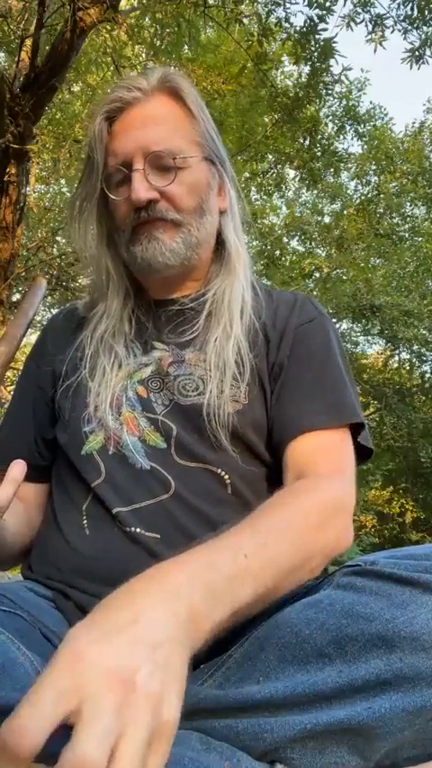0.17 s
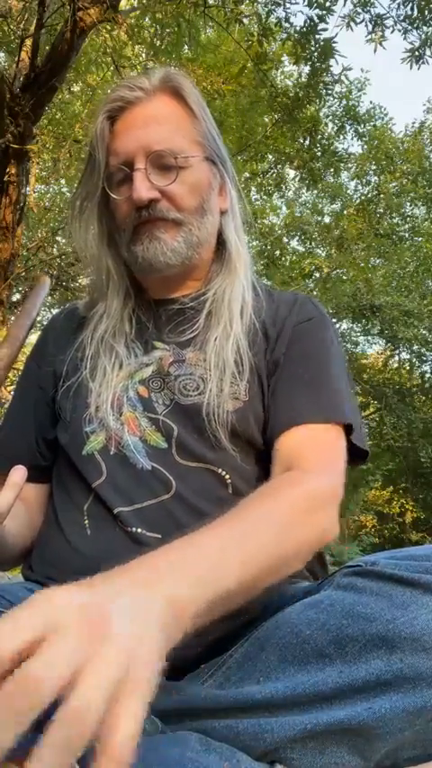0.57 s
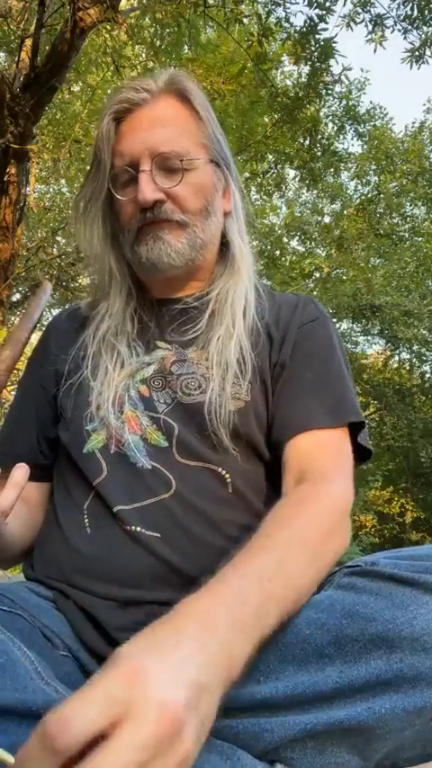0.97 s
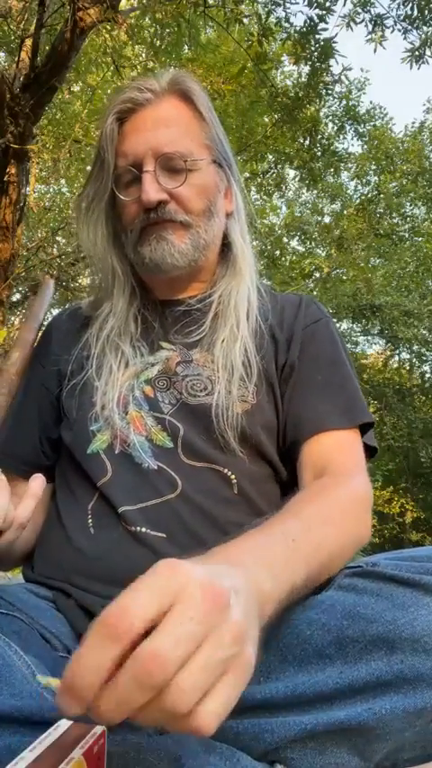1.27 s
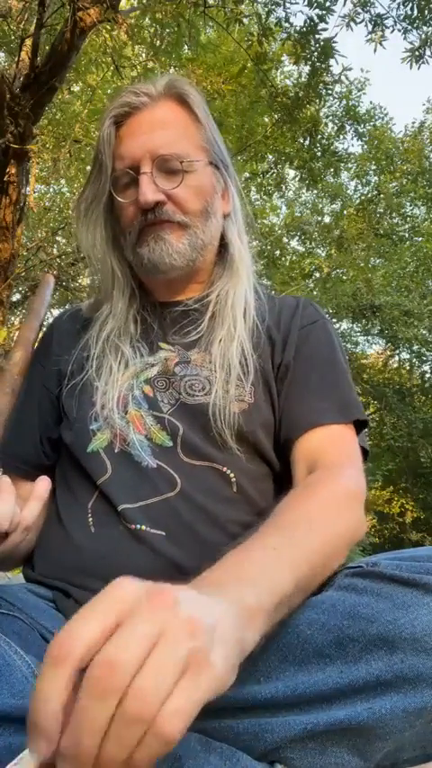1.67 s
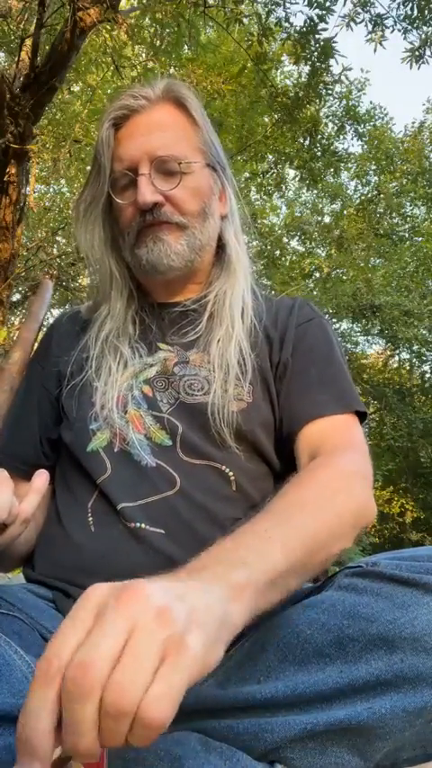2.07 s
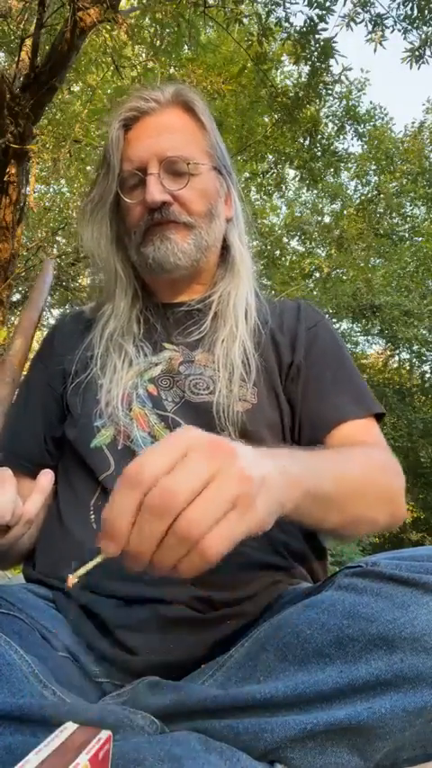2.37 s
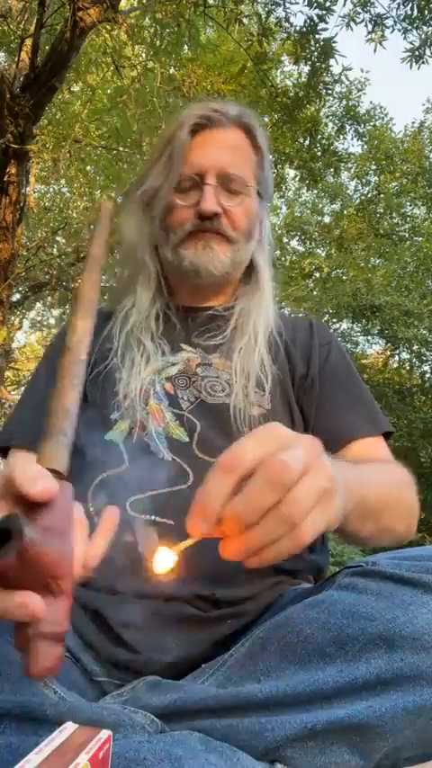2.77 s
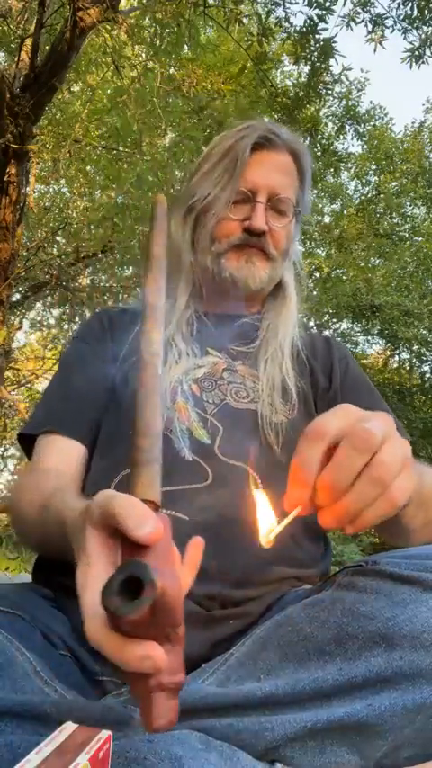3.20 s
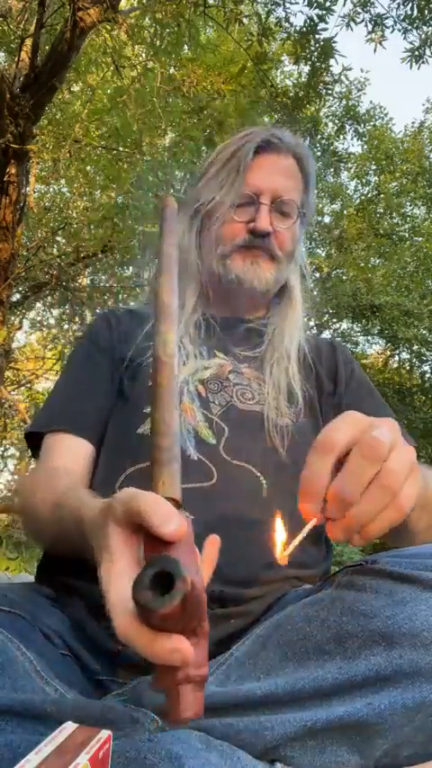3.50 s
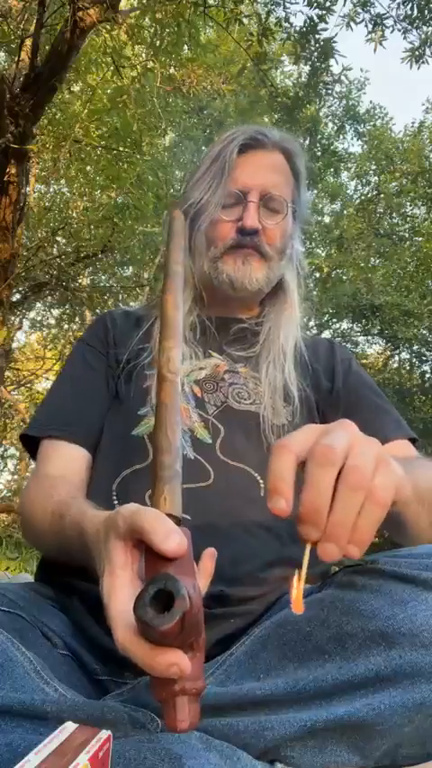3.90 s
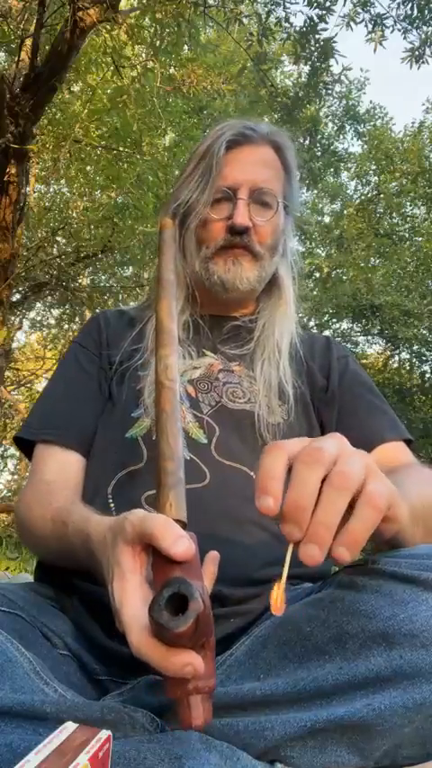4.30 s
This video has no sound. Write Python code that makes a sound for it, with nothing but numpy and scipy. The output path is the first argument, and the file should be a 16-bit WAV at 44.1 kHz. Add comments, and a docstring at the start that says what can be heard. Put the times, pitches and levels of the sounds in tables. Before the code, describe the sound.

A low traffic rumble with an engine drone and soft open-air wash runs throughout. Nearby, a match head makes gritty scrapes on a hollow cardboard box, with little snags and clacks. One fast stroke bursts into a bright, sharp crack; then a quiet breathy fizz with dull crackles swells to a thin sizzle and stops, leaving two tiny pops. Close, dry stereo pickup.

```python
"""Outdoors, over a low steady rumble and a soft wash of air, a match is scraped along a cardboard matchbox.
The first strokes only rasp: noisy grains follow the pressure, with ticks, hollow knocks and short clacks.
A quick last stroke cracks alight in a volley of tiny bursts with a bright, ringing edge, then spits thinly.
The head fizzes for about a second in filtered noise with puffs, crackles and pops, and ends in a sizzle;
a few pops follow. A two-port microphone hears it all, with phase and balance differing over frequency."""
import sys
import numpy as np
from scipy import signal
from scipy.fft import rfft, irfft, next_fast_len
from scipy.io import wavfile

SR = 44100
rng = np.random.default_rng(int(sys.argv[2]) if len(sys.argv) > 2 else 0)


def master(y):
    """Save y as 16-bit WAV."""
    cut = np.clip(np.atleast_2d(y).T, -1, 1)
    pcm = np.round(cut * 32767)  # scale
    wavfile.write(sys.argv[1], SR, pcm.astype(np.int16))


N = 196245
T = np.arange(N) / SR  # seconds
SIZE = 2 * next_fast_len(N // 2 + 4096)  # transform length, padded so that tails do not wrap around
HZ = np.fft.rfftfreq(SIZE, 1 / SR)

# Strokes of the head over the striker. Each row: start of full pressure in seconds, friction in dB before
# the layer trims, rise in seconds per 20 dB, hold in seconds, fall in seconds per 20 dB,
# level of the light glide after it in dB, box ring relative to the friction in dB.
STROKES = [ (0.034, -47.5, 0.074, 0.012, 0.11, -51.5, -1), (0.166, -28.5, 0.11, 0.042, 0.037, -51, -1.5),
           (0.699, -30.5, 0.0086, 0.021, 0.016, -53, -1.5), (0.908, -42, 0.17, 0.015, 0.26, -50.5, 0.5),
           (1.754, -45, 0.03, 0.006, 0.02, -70, 1), (2.138, -31, 0.019, 0.026, 0.033, -57, 0.5)]

# The burning of the head, shared by the crack and the fizz
LIGHT_S, SPENT_S = 2.1445, 3.237  # fully alight and burnt out, seconds
DIE_S = 0.042  # seconds per 20 dB of fall once the head is spent


def amp(db):
    """Decibels to gain."""
    return 10 ** (np.asarray(db) / 20)


def unit(x):
    """Scales to rms 1."""
    return x / np.sqrt(np.mean(abs(x) ** 2) + 1e-20)


def envelope(s, rise_s, hold_s, fall_s):
    """Full from s for hold_s; it gains 20 dB in rise_s before and loses 20 dB in fall_s after."""
    before = (s - T) / rise_s
    after = (T - s - hold_s) / fall_s
    return amp(-20 * np.clip(np.maximum(before, after), 0, 10))


def over_hz(rows, axis=1):
    """One column of a table, interpolated along a log-frequency axis."""
    rows = np.array(rows)
    return np.interp(np.log(HZ + 1), np.log(rows[:, 0] + 1), rows[:, axis])


def causal(db):
    """The response of power 1 with this dB shape that rings only after a blow (minimum phase)."""
    log_gain = np.log(amp(np.r_[db, db[-2:0:-1]]))
    return unit(np.exp(np.conj(signal.hilbert(log_gain)))[:len(HZ)])


def colour(x, response):
    """Filters by a frequency response."""
    return irfft(rfft(x, SIZE) * response, SIZE)[..., :N]


def resonance(hz, width, db):
    """The power response of one resonant peak."""
    detuning = (HZ ** 2 - hz ** 2) / (width * HZ + 1)
    return amp(db) ** 2 / (1 + detuning ** 2)


def grains(per_s, spread_db, smooth):
    """Two trains of tiny fractures of uneven size over a share of smooth noise, at rms 1."""
    fires = rng.random(N) < per_s / SR
    size = amp(spread_db * np.minimum(rng.exponential(1, N), 3)) * fires
    sharp = unit(size * rng.choice([-1., 1.], (2, N)))
    return unit(sharp + smooth * rng.standard_normal((2, N)))


def flutter(rate_hz, depth_db):
    """A random wavering gain of power 1."""
    slow = colour(rng.standard_normal(N), np.exp(-(HZ / rate_hz) ** 2))
    return unit(amp(depth_db * unit(slow)))


def bursts(rows):
    """Noise clusters (s, dB, decay s) that build and die; the level is their energy spread over 3 ms."""
    t = np.arange(SR // 30) / SR
    out = np.zeros((2, N + len(t)))
    for s, db, decay_s in rows:
        shape = (t / decay_s) ** 2 * np.exp(-t / decay_s)
        burst = unit(rng.standard_normal((len(t), 2)).T * shape)
        start = max(round((s - decay_s) * SR), 0)
        out[:, start:start + len(t)] += amp(db) * burst * np.sqrt(.003 * SR / len(t))
    return out[:, :N]


def kicks(times, levels_db):
    """Single sharp impulses in the shared part; the level is their energy spread over 3 ms."""
    out = np.zeros((2, N))
    out[0, np.round(np.array(times) * SR).astype(int)] = amp(levels_db) * np.sqrt(.003 * SR)
    return out


def box_response():
    """The broad, quickly damped modes of the cardboard, rolled off above 3 kHz."""
    # Modes of the cardboard box. Each row: frequency in Hz, width in Hz, relative level in dB.
    box_modes = [(184, 99, -3), (340, 120, -10.5), (485, 28, -10.5), (550, 98, -0.5), (715, 70, -5),
                 (778, 63, 4), (895, 39, 1), (1075, 160, 0), (1234, 69, 1), (1442, 160, -2),
                 (2280, 870, -13)]
    power = sum(resonance(*mode) for mode in box_modes)
    return causal(10 * np.log10(power / (1 + (HZ / 3000) ** 4) + 1e-10))


def scrape(box_db=-1.5, grit_db=-6.0):
    """Fine grit rasps under the head, while its coarser slips shake the box."""
    # Tone of the grit. Each row: frequency in Hz, relative level in dB per Hz.
    grit_spectrum = [(100, -4), (250, -6.5), (500, 11), (1500, 9.5), (2600, 9.5), (3300, -1), (4500, 6),
                     (5300, -1), (6100, 0), (7500, 1), (9600, -13.5), (10400, -11.5), (12500, -9),
                     (15500, -15)]
    friction = shaking = 0
    for s, db, rise, hold, fall, _, ring_db in STROKES:
        pressure = envelope(s, rise, hold, fall)
        friction = friction + amp(db) * pressure
        shaking = shaking + amp(db + ring_db) * pressure
    judder = flutter(rate_hz=220, depth_db=2)
    grit = grains(per_s=3500, spread_db=3.0, smooth=0.43) * judder
    coarse = grains(per_s=800, spread_db=2.5, smooth=0.35)
    slips = unit(grit + coarse) * flutter(rate_hz=120, depth_db=1.0)
    rasp = colour(grit * friction, causal(over_hz(grit_spectrum)))
    shaken_box = colour(slips * shaking, box_response())
    return amp(grit_db) * rasp + amp(box_db) * shaken_box


def glide(fade_s=0.12):
    """As the pressure eases after each stroke, the head only whispers and leaves the box still."""
    # Tone of the whisper. Each row: frequency in Hz, relative level in dB per Hz.
    whisper_spectrum = [(500, -8), (2500, -3), (4500, 3.5), (6500, -2), (9000, 0.5), (11000, -7),
                        (15500, -5)]
    # the touch fades 20 dB in every fade_s
    touch = sum(amp(db) * envelope(s, rise, hold, fade_s) for s, _, rise, hold, _, db, _ in STROKES)
    whisper = grains(per_s=4300, spread_db=10.0, smooth=0.51) * touch
    return colour(whisper, causal(over_hz(whisper_spectrum)))


def snags():
    """Larger catches: a tick with a hollow knock from the box, softer the longer the contact."""
    # The head knocking or snagging on the striker. Each row: time in seconds, tick level in dB,
    # box ring relative to the tick in dB, contact time in seconds.
    snag_rows = [ (.0315, -41, 12, .001), (.0395, -47, 13, 0.00097), (0.0512, -35, 5, 0.0011),
                 (.0708, -41, 15.5, .0008), (0.094, -45.5, 13.5, 0.00076), (.126, -44.5, 13, 0.0018),
                 (.143, -45.5, 17.5, 0.0016), (.172, -40.5, 15.5, .0008), (.194, -34, 11.5, 0.0009),
                 (.218, -43, 9, .0008), (0.682, -50, 2, 0.00088), (0.6951, -41, -2, 0.0011),
                 (0.7017, -38, 1.5, 0.0014), (0.7047, -41, 8, 0.0013), (.7127, -42.5, 9.5, 0.00037),
                 (0.7196, -42.5, 11, 0.00068), (0.7398, -32, 1, 0.0009), (.83, -56.5, 17, 0.0021),
                 (0.911, -43, 5.5, .002), (.931, -38.5, -1.5, 0.0017), (0.956, -51.5, 12, 0.0034),
                 (1.023, -45.5, 6, 0.00089), (1.047, -50, 4, 0.001), (1.134, -62, 20, .0035),
                 (1.725, -34.5, -4, 0.0006), (1.7582, -44, 6, .0011), (2.1558, -37.5, 13, 0.00071),
                 (2.167, -38.5, 10.5, 0.00086), (2.18, -44, 11, 0.0014), (2.2212, -51, 13.5, 0.00088)]
    # Tone of the tick. Each row: frequency in Hz, relative level in dB per Hz.
    tick_spectrum = [(200, -3), (1000, 8.5), (2400, 0), (3300, 1.5), (4600, 2.5), (7000, -1.5), (9500, 5),
                     (11000, -10.5), (15500, -8.5)]
    ticks = bursts([(s, db, contact_s) for s, db, _, contact_s in snag_rows])
    knocks = bursts([(s, db + ring_db, contact_s) for s, db, ring_db, contact_s in snag_rows])
    return colour(ticks, causal(over_hz(tick_spectrum))) + colour(knocks, box_response())


def taps():
    """The stick taps the edge of the box: impulses ring two modes in a short wooden clack."""
    # Taps on the box edge. Each row: time in seconds, level in dB.
    tap_rows = [(0.7202, -38), (0.7397, -40), (1.024, -38.5), (2.2225, -45)]
    # Modes of the clack. Each row: frequency in Hz, width in Hz, relative level in dB.
    clack_modes = [(2300, 150, 0), (4550, 220, -6.5)]
    power = sum(resonance(*mode) for mode in clack_modes)
    power = power * HZ ** 2 / (HZ ** 2 + 1500 ** 2)  # thinned in the bass
    return colour(kicks(*np.transpose(tap_rows)), causal(10 * np.log10(power + 1e-10)))


def ignition():
    """The head catches in a volley of tiny bursts with a bright, ringing edge, then spits thinly."""
    # The biggest explosions. Each row: time in seconds, level in dB.
    crack_rows = [(2.1369, -21.5), (2.145, -16), (2.1483, -21)]
    # Narrow peaks in the tone of the crack. Each row: frequency in Hz, width in Hz,
    # level against the plain crack in dB.
    crack_peaks = [(2810, 70, 6.5), (3180, 70, 5), (4800, 66, 1.5), (5300, 77, 4.5), (5890, 60, 4),
                   (6400, 80, -0.5), (6470, 90, 7), (6870, 73, 6), (12790, 70, 7), (14000, 80, 8.5),
                   (14390, 80, 5)]
    # Tone of the plain crack. Each row: frequency in Hz, relative level in dB per Hz.
    bright_spectrum = [(100, -6), (300, -5), (560, 3.5), (700, -1), (890, 8), (1300, -5), (1900, -0.5),
                       (3000, -0.5), (4200, 1), (5200, -0.5), (6100, -1), (6650, 1), (7800, 7.5), (8800, 8),
                       (9600, 14), (10300, 0), (12500, -1.5), (15500, -2)]
    # Tone of the thin spit. Each row: frequency in Hz, relative level in dB per Hz.
    spit_spectrum = [(500, -12), (4000, -13.5), (8000, -16), (11000, -4.5), (15500, -2.5)]
    catch_s, sputter_s = 2.137, 2.162  # first spark and start of the spit's full level, seconds
    rise_s = 0.027  # seconds per 20 dB
    volley = amp(-16.5) * envelope(LIGHT_S, rise_s, hold_s=0.0075, fall_s=0.011)
    sputter = amp(-32) * envelope(sputter_s, rise_s, hold_s=0.00807, fall_s=0.0056)
    # a steep rise keeps the sparks from sounding much before the first one
    alight = envelope(catch_s, 0.0023, SPENT_S - catch_s, DIE_S)
    clumps = flutter(rate_hz=450, depth_db=1.8)
    sparks = grains(per_s=4500, spread_db=0.5, smooth=0.42) * alight * clumps
    peaks = 1 + sum(resonance(*peak) for peak in crack_peaks)
    crack = sparks * volley + kicks(*np.transpose(crack_rows))
    bright_crack = colour(crack, causal(over_hz(bright_spectrum) + 10 * np.log10(peaks)))
    return bright_crack + colour(sparks * sputter, causal(over_hz(spit_spectrum)))


def flare():
    """The head fizzes, blows out an ebbing rush of gas, puffs, crackles, pops and ends in a thin sizzle."""
    # Puffs of gas from the head. Each row: start in seconds, level in dB, hold in seconds.
    puff_rows = [(2.228, -43.5, 0.02), (2.341, -60, 0.0093), (2.416, -53.5, 0.017)]
    # Dull crackles as the flame spreads over the head. Each row: time in seconds, level in dB.
    crackle_rows = [(2.245, -45.5), (2.336, -48), (2.4225, -49.5), (2.432, -44), (2.439, -48), (2.494, -48),
                    (2.6995, -52.5), (2.7275, -49)]
    # Small pops of the burning head and the wood. Each row: time in seconds, level in dB.
    pop_rows = [(2.299, -54), (2.466, -47.5), (3.396, -50), (4.193, -47.5)]
    # Tones of fizz, sizzle, gas, pop and crackle. Each row: frequency in Hz, relative level in dB per Hz.
    hiss_spectrum = [(300, 2.5), (1500, -4.5), (3700, 12), (4500, 7.5), (5600, 0.5), (7200, 6.5),
                     (8800, -2.5), (10500, 0), (14000, 2), (15800, 2.5)]
    sizzle_spectrum = [(500, -7), (2500, 6), (4200, 7), (5600, 0), (7200, 4), (9000, 1), (12500, -1),
                       (15800, -2.5)]
    rush_spectrum = [(100, -12.5), (350, 5), (750, 1), (1400, 0), (2200, -10), (4000, -8), (5500, -19),
                     (7500, -19.5), (15000, -39)]
    pop_spectrum = [(500, -11), (3000, 3), (7000, 3), (10000, -2.5), (15500, 5.5)]
    crackle_spectrum = [(300, -1), (1200, 5.5), (2500, -1), (4200, 0), (5500, -13), (15000, -20)]
    kindle_s = 0.029  # seconds per 20 dB of rise
    pop_s, crackle_s = 0.00099, 0.0013  # decay times, seconds
    burning = envelope(LIGHT_S, kindle_s, SPENT_S - LIGHT_S, DIE_S)
    # the fizz surges at the start and again, as a sizzle, at the end
    first = amp(-58.5) * envelope(LIGHT_S, kindle_s, hold_s=0, fall_s=0.75)
    last = amp(-55) * envelope(SPENT_S, rise_s=0.19, hold_s=0, fall_s=DIE_S)
    hiss = burning * (amp(-64) + first)
    # the rush of gas ebbs as the head is used up
    rush = amp(-52.5) * burning * envelope(LIGHT_S, kindle_s, hold_s=0, fall_s=2.3)
    puffs = sum(amp(db) * envelope(s, 0.0075, hold, 0.018) for s, db, hold in puff_rows)
    fizz = grains(per_s=2300, spread_db=4.0, smooth=0.8) * flutter(rate_hz=50, depth_db=1.3)
    gas = rng.standard_normal((2, N)) * (rush + puffs) * flutter(rate_hz=49, depth_db=1.0)
    pops = bursts([(s, db, pop_s) for s, db in pop_rows])
    crackles = bursts([(s, db, crackle_s) for s, db in crackle_rows])
    layers = [
        (fizz * hiss, hiss_spectrum),
        (fizz * last, sizzle_spectrum),
        (gas, rush_spectrum),
        (pops, pop_spectrum),
        (crackles, crackle_spectrum)]
    return sum(colour(sound, causal(over_hz(spectrum))) for sound, spectrum in layers)


def close_echo(x):
    """One close, weak echo, inverted or upright, with a slowly changing delay, colours the sound."""
    # The close echo. Each row: time in seconds, delay in seconds, strength (inverted if negative).
    echo_rows = [(0.2, 0.000577, -0.1), (.72, .00056, -0.22), (2.15, .00123, 0.13)]
    s, delay_s, strength = np.transpose(echo_rows)
    late = T - np.interp(T, s, delay_s)
    delayed = np.array([np.interp(late, T, row) for row in x])
    return x + np.interp(T, s, strength) * delayed


def surroundings(x, delay_s=0.0071, echo_db=-16):
    """The seated body and the ground send back one weak, later echo."""
    return colour(x, 1 + amp(echo_db) * np.exp(-2j * np.pi * HZ * delay_s))


def ports(pair, field):
    """A shared and a scattered part reach the two ports with their phase and balance."""
    # Phase between the ports. Each row: frequency in Hz, lead of the left port in radians.
    phase_rows = [(20, 0), (150, -.1), (500, -.65), (1200, -1.2), (1800, -2.5), (2400, -1.7), (3200, -1.9),
                  (4200, -4.3), (5800, -5.3), (7000, -4.6), (8100, -3.2), (9900, -3.2), (10900, -5.2),
                  (13400, -5.3), (14800, -3.7)]
    shared, scattered = rfft(pair, SIZE)
    like = np.clip(over_hz(field), 0, 1)
    side = np.array([[1], [-1]])  # left, right
    both = shared * np.sqrt((1 + like) / 2) + side * scattered * np.sqrt((1 - like) / 2)
    balance = amp(side * over_hz(field, axis=2) / 2)
    balance /= np.sqrt(np.mean(balance ** 2, axis=0))
    lead = np.exp(.5j * side * over_hz(phase_rows))
    return irfft(both * balance * lead, SIZE)[:, :N]


def steady(spectrum):
    """Two independent noises with the given level per Hz."""
    return colour(rng.standard_normal((2, N)), amp(over_hz(spectrum)) * np.sqrt(SR / 2))


def outdoors():
    """The soft, nearly even wash of open air: filtered noise with a slight waver."""
    # Tone of the open air. Each row: frequency in Hz, level in dB full scale per Hz.
    air_spectrum = [(25, -100), (100, -83), (300, -81.5), (500, -79), (780, -79), (1050, -85), (1500, -86),
                    (2050, -86.5), (3000, -95.5), (4500, -100), (6000, -102), (7500, -110), (10200, -124),
                    (13000, -117), (16000, -123)]
    return steady(air_spectrum) * flutter(rate_hz=18, depth_db=0.4)


def rumble():
    """Far traffic with an engine drone in it; such long waves are the same at both ports."""
    # Traffic and drone before their gains. Each row: frequency in Hz, level in dB full scale per Hz.
    traffic_spectrum = [(15, -81.5), (30, -89), (40, -75), (52, -57.5), (68, -57.5), (82, -59.5),
                        (105, -68), (122, -61), (160, -71.5), (220, -75.5), (320, -81.5), (500, -83.5),
                        (1500, -160)]
    drone_spectrum = [(50, -160), (88, -69.5), (97, -58.5), (106, -63), (200, -160)]
    # Course of the drone. Each row: time in seconds, gain in dB.
    drone_gain = [(0, 1), (1.1, 8), (1.8, 4.5), (3.2, 6.5), (4.0, -5.5), (4.45, -13)]
    drone = steady(drone_spectrum)[0] * amp(np.interp(T, *np.transpose(drone_gain)))
    nearing = amp(-.5 + 0.5 * T)  # the traffic draws slowly nearer, 0.5 dB per second
    return nearing * steady(traffic_spectrum)[0] + drone


def scene():
    """The match close by, the background far off."""
    # Near and far sound at the ports. Each row: frequency in Hz, likeness 0-1, left minus right in dB.
    near_field = [(100.5, 1, 2), (838, 0.7, -2), (1490, 0.66, -3), (2257, 0.8, 4.5), (3060, 0.7, 2),
                  (4180, 0, 2), (5570, 0.4, -1), (7480, 0.95, 0.5), (8600, 1, -0.5), (10130, 1, 1.5),
                  (10700, 0, -2), (14100, 0.85, 2), (15000, 0.9, 0)]
    far_field = [(98, 1, 0.5), (297, 0.51, 6.5), (650, .05, 4.5), (1330, 0.17, 0.5), (2050, 0.066, 8),
                 (3270, 0.085, 1), (4270, 1, 1), (6000, 0.22, 0.2), (7100, 0.93, -0.5), (8060, 1, 1),
                 (10300, 0.99, -0.5), (11900, 0.379, -0.5), (14600, .5, 1)]
    at_the_box = scrape() + glide() + snags() + taps() + ignition()
    match = surroundings(close_echo(at_the_box) + flare())
    return ports(match, near_field) + ports(outdoors(), far_field) + rumble()


def record(dry, cut_hz=15900):
    """The recorder's band limit: a steep linear-phase low-pass."""
    low_pass = signal.firwin(511, cut_hz, window=("kaiser", 9), fs=SR)
    return signal.oaconvolve(dry, low_pass[None], "same")


dry = scene()
out = record(dry)
master(out)
```